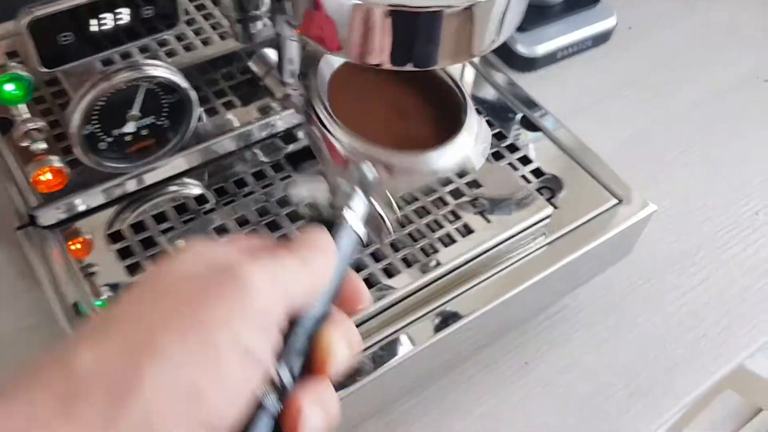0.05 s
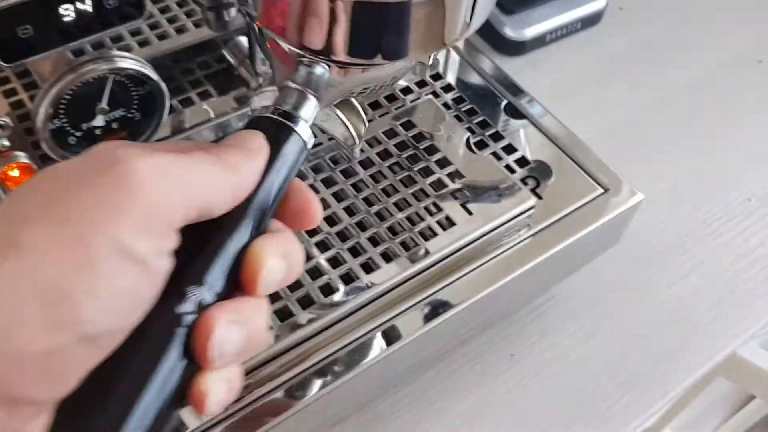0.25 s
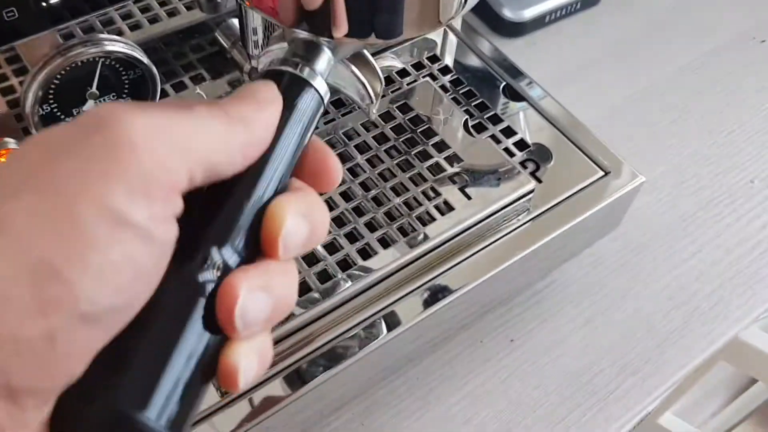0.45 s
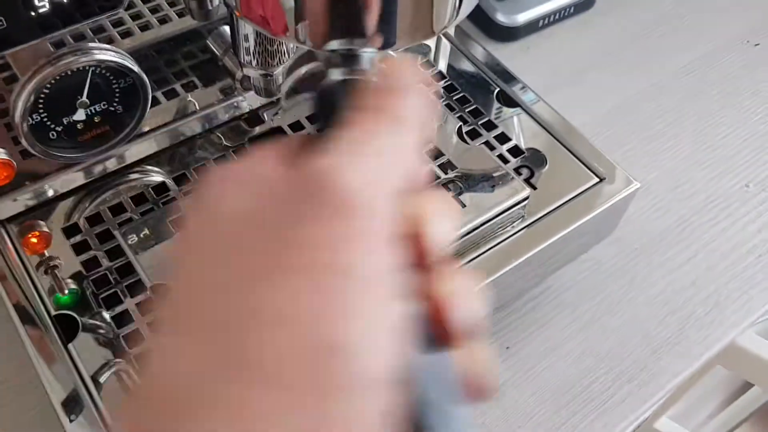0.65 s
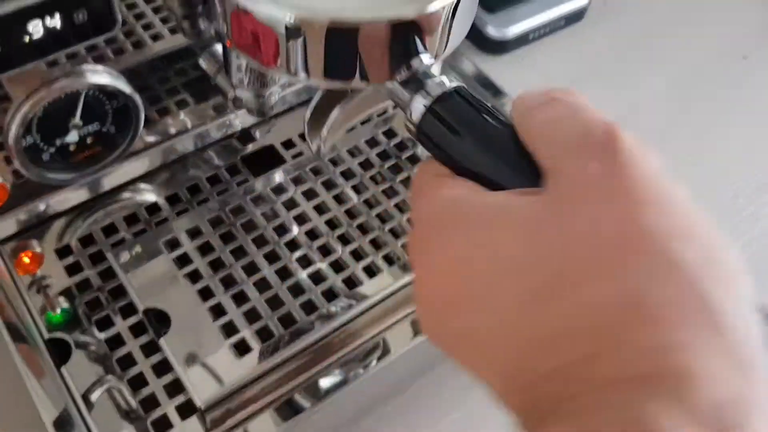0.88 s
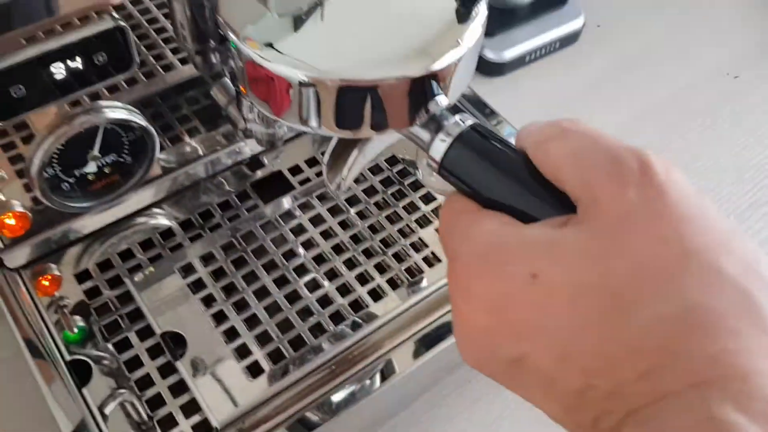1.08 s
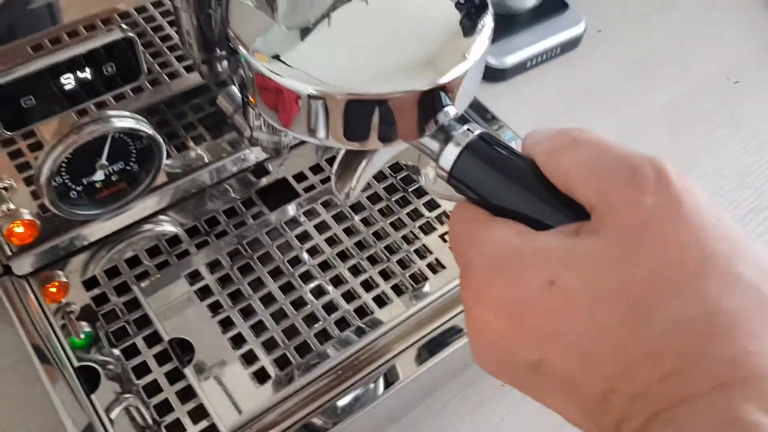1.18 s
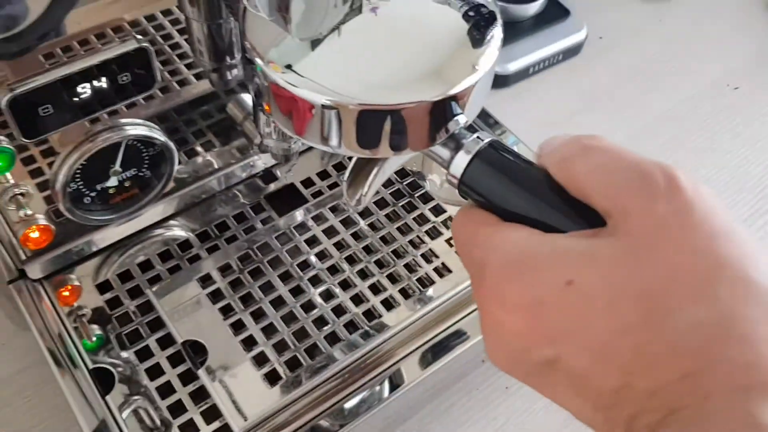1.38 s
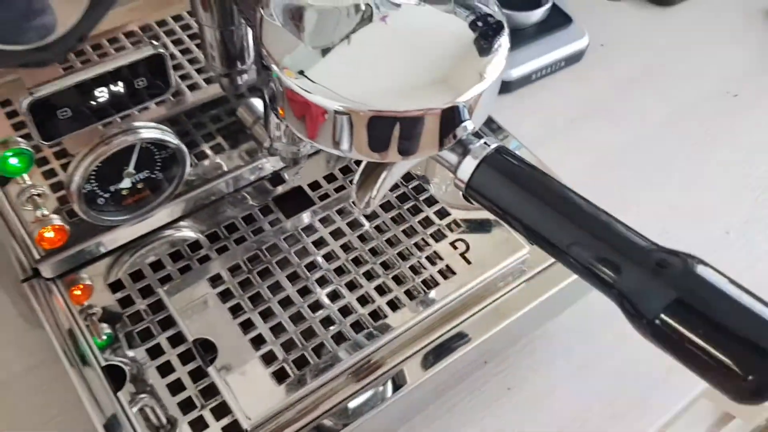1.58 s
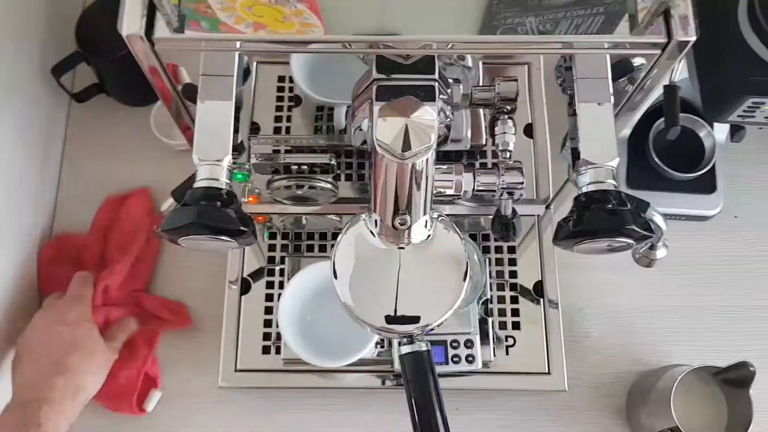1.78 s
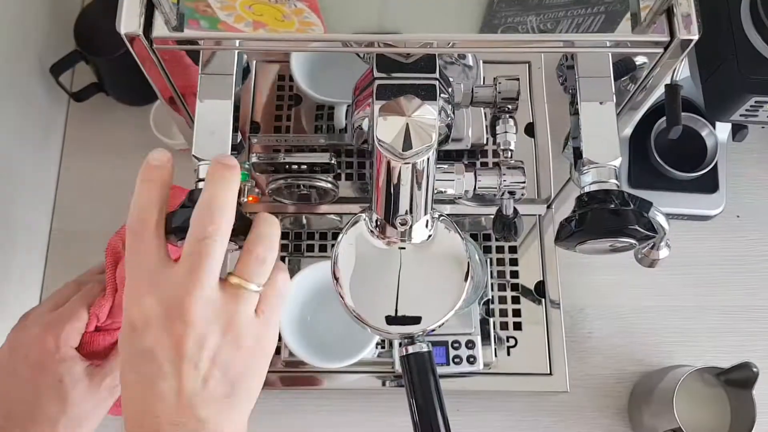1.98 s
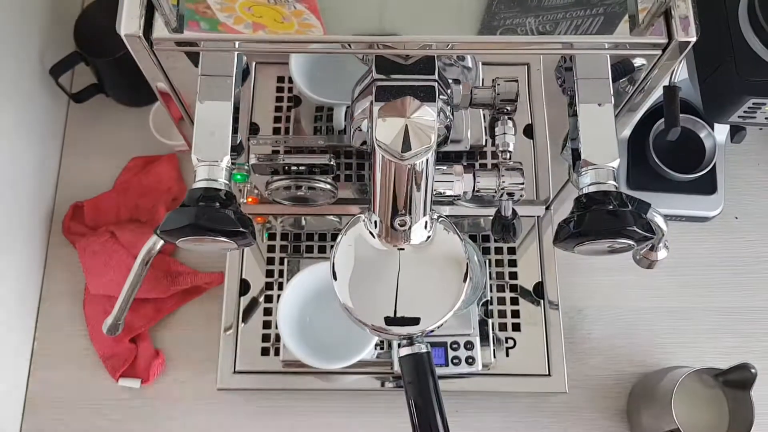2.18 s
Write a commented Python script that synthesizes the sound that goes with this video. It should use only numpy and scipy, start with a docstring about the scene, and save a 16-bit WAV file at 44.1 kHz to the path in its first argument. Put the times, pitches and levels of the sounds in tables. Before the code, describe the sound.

A steel portafilter clunks into an espresso machine, then steam gives one short hiss.

```python
"""Over the hum of an espresso machine in a small kitchen, a steel portafilter knocks into the group head,
seats with a double clunk and is twisted tight. Each contact rings the portafilter, thumps the machine's
body and stirs its sheet panels. Soft knocks follow as the handle is let go, then a cloth rustles.
Near 1.9 s the steam wand spits one short, hissing jet, and at the very end something is bumped."""
import sys
import numpy as np
from scipy import signal
from scipy.fft import rfft, irfft, next_fast_len
from scipy.io import wavfile
from scipy.ndimage import map_coordinates

SR = 44100
rng = np.random.default_rng(int(sys.argv[2]) if len(sys.argv) > 2 else 0)


def store_wav(level_fs):
    """Save 16-bit WAV to argv[1]."""
    pcm = np.round(np.clip(np.atleast_2d(level_fs), -1, 1) * 32767)
    wavfile.write(sys.argv[1], SR, pcm.T.astype(np.int16))


N = 99225

# steel-on-steel hits with a fader for each layer (time [s], portafilter ring [dB], group head [dB],
# panels [dB], clack [dB], tick [dB], thump [dB], leftward pan [dB], favoured pitch [Hz])
METAL_HITS = [(0.22, -38.5, -57, -57.5, -44.5, -26, -46, 4, 1590),
              (0.2232, -12, -47.5, -38.5, -27.5, -17, -18.5, 0, 1597),
              (0.2478, -30.5, -57, -49, -34, -23, -32.5, 7, 1600),
              (0.2767, -16.5, -25, -43.5, -23, -34.5, -31, 2, 660),
              (0.2976, -41.5, -47, -49, -36, -32.5, -38.5, 2, 2200),
              (0.3259, -30.5, -37.5, -50.5, -30.5, -57, -36, 1.5, 797),
              (0.334, -39.5, -45.5, -50, -40.5, -43, -38.5, 1.5, 545),
              (.361, -34.5, -43.5, -48, -38, -49.5, -25, -1.5, 480),
              (0.4131, -26, -48, -51.5, -27, -25.5, -27.5, 6.5, 600),
              (0.4351, -7.5, -24, -28.5, -12, -25, -23, 0, 1473),
              (0.4573, -14, -36.5, -30.5, -16.5, -16, -16, 1, 1230),
              (.489, -45, -43, -42.5, -26.5, -27, -28.5, 5.5, 1620),
              (.509, -52, -42.5, -64, -32, -45, -36.5, 0, 1330),
              (0.6789, -38, -38.5, -55, -37.5, -55.5, -36.5, 4.5, 833)]
# dull knocks through the machine's body (time [s], thump [dB], knock [dB])
DULL_KNOCKS = [(.468, -12.5, -33.5), (0.729, -42.5, -62), (0.838, -51, -81), (.915, -46, -64),
               (0.975, -52, -56), (1.004, -73, -55), (1.455, -47, -71), (1.476, -51.5, -82),
               (2.2255, -41.5, -43), (2.231, -30, -30)]
# cloth and hand strokes (centre time [s], half length [s], level [dB])
CLOTH_STROKES = [(1.654, 0.012, -60), (1.677, .012, -66), (1.761, 0.022, -67), (1.84, 0.017, -65),
                 (2.076, 0.028, -60), (2.119, 0.012, -59), (2.173, .014, -58), (2.235, .02, -61.5)]

# ringing parts (frequency [Hz], level [dB], t60 [s])
PORTAFILTER_MODES = [(3181, -14, 0.045), (3430, -19.5, .05), (4110, -8.5, 0.14), (4143.5, -4, 0.07),
                     (4240, -10, .06), (4387, -19, 0.074), (4400, -20.5, 0.069), (4480, -24, .13),
                     (7246, -23, 0.067), (11950, -21.5, .08), (12515, -18, .11), (13400, -17, .05)]
HEAD_AND_TRAY_MODES = [(505, -30, .9), (660, -6, .12), (858, -18, .85), (1054, -10, .11), (1245, -27, .8),
                       (1394, -25, .7), (1943, -10, .2), (2008, 0, .11), (2130, -6, .1), (2290, -3, .09),
                       (2606, -9, .16), (2845, -5, .16)]
PANEL_MODES = [(1260, -10, .36), (1321, -3, .26), (1458, -1, .26), (1560, -6, .1), (1677, -7, .3),
               (1764, -7, .23), (3040, -9, .23), (3132, -7, .23), (3676, -10, .25)]
BODY_MODES = [(70.8, -17.5, 0.61), (89.43, -20, 0.1), (122, -9.5, .3), (140.5, -8.5, .35),
              (163.5, 1.5, 0.13), (200.7, -4.5, 0.23), (221.25, -3, 0.23), (272, -16.5, 0.23),
              (299.3, -14.5, .28)]
# resonances of the wand and the space round it (frequency [Hz], width [Hz], boost [dB])
WAND_PEAKS = [(751, 50, 3), (1647, 46, 7.5), (1900, 40, 4.5), (2630, 67, 7.5), (4340, 72, -5),
              (5250, 47, 3.5), (7950, 410, 6.5), (8360, 720, 1), (10050, 68, 8.5)]
# the motor's tones (frequency [Hz], level [dB])
HUM_TONES = [(98.5, -67.5), (147.7, -60), (197, -67.5), (245, -81), (334, -88), (503, -92.5)]

# tone colour of each noise layer (frequency [Hz], relative level [dB])
CLACK_EQ = [(100, -19.5), (300, -2), (450, -6), (600, -3), (760, -8), (1050, -1.5), (1350, -4),
            (2000, -1.5), (2600, -8), (3300, -3), (3800, -11), (4400, -9), (5000, -14), (6200, -14),
            (8000, -16), (16000, -36)]
TICK_EQ = [(300, 0), (1500, -3), (4000, -8.5), (5000, -2.5), (7500, -3.5), (9000, -3), (11000, 2.5),
           (12700, 10), (14200, -7.5), (16000, 6.5), (17500, -27)]
CHASSIS_EQ = [(150, -14), (400, -7), (900, -5.5), (1400, -3), (2100, -1), (3000, -5), (3700, -3),
              (4300, 0.5), (5000, -12.5), (6000, -9.5), (9000, -11.5), (12500, -13), (16000, -21.5)]
KNOCK_EQ = [(40, -15), (150, -3), (380, 5), (600, -7.5), (1100, -16), (2500, -19), (5000, -40),
            (16000, -51.5)]
STEAM_EQ = [(50, -15), (160, -3), (300, -4), (500, -6), (700, -6.5), (900, -4.5), (1400, 2), (3000, 1.5),
            (5000, 3), (6300, -1.5), (7700, 1), (12000, 3.5), (15500, -1)]
CLOTH_EQ = [(150, -45), (700, 4), (1500, 1.5), (3500, -2), (7000, -4), (12000, -1.5), (16000, -7)]
ROOM_TONE_EQ = [(25, -16), (55, 6.5), (100, -2.5), (150, 2.5), (210, -8), (270, -11), (370, -17.5),
                (600, -27.5), (1500, -28), (4000, -36), (8000, -35), (12000, -24.5), (16000, -27)]
# stereo image of the noise (frequency [Hz], left-right correlation [-1 to 1])
STEREO_LIKENESS = [(100, 0.88), (300, .94), (650, .85), (1200, -0.29), (3000, 0), (15000, -0.3)]
# length of the kitchen's reverb (frequency [Hz], t60 [s])
REVERB_DECAY = [(100, .6), (300, 0.93), (800, .48), (2000, 0.45), (4500, 0.5), (8000, 0.39), (14000, 0.25)]
# strength of the kitchen's reverb (frequency [Hz], level [dB])
REVERB_EQ = [(100, -14.5), (400, -6.5), (1500, -9.5), (5000, -15), (14000, -12.5)]

RING_ATTACK_S, PANEL_ATTACK_S, BODY_ATTACK_S = .0021, .0018, .0037
GRIP_S, GRIP_T60_S = .03, .052  # free ring, then damping against the group head
CHASSIS_DB, CHASSIS_T60_S, CHASSIS_ATTACK_S = 4.5, .27, .007
SNAP_DB, SNAP_T60_S = 2, .0079  # the first instant of a contact, over its short ring
FAVOUR_DB, FAVOUR_WIDTH = 7, .2  # boost round a hit's favoured pitch; width relative to that pitch
WAVER_RAD, WAVER_PER_S = .4, 60  # loose parts make the ring unsteady
STEAM_S, STEAM_RISE_S, STEAM_HOLD_S, STEAM_FALL_S = 1.895, .036, .058, .042
STEAM_DB, STEAM_DEPTH_DB = -21, 43
SPIT_S, SPIT_LENGTH_S, SPIT_DB = 1.936, .006, 4.5  # the first gush overshoots
HUM_WAVER_DB, HUM_DRIFT_RAD, ROOM_TONE_DB, REVERB_ONSET_S = 1, .25, -63.5, .012
BASS_PAN_DB, STEAM_PAN_DB, CLOTH_PAN_DB = 4.5, 3, 2.99
LOW_CUT_HZ, TOP_HZ, EDGE_HZ, CEILING = 38, 16050, 450, .92


def portafilter():
    """Steel meets the group head: ringing parts, the housing's wash, a clack, a bright tick and a thump."""
    out = np.zeros((2, N))
    for s, ring_db, head_db, panel_db, clack_db, tick_db, thump_db, pan_db, near_hz in METAL_HITS:
        clack = crack(CLACK_EQ, t60=.075, peaks=[(near_hz, near_hz * FAVOUR_WIDTH, FAVOUR_DB)])
        head_modes = favour(HEAD_AND_TRAY_MODES, near_hz)
        panel_modes = favour(PANEL_MODES, near_hz)
        add(out, s, amp(ring_db) * pan(pan_db - 3.5) * clink())
        add(out, s, amp(head_db) * pan(pan_db - 1) * ring(head_modes, PANEL_ATTACK_S, spread=.38))
        add(out, s, amp(panel_db) * pan(pan_db) * ring(panel_modes, PANEL_ATTACK_S, spread=.77))
        add(out, s, amp(panel_db) * pan(pan_db + 1.5) * chassis())
        add(out, s, amp(clack_db) * pan(pan_db) * clack)
        add(out, s, amp(tick_db) * pan(pan_db + 1.5) * crack(TICK_EQ, t60=.073))
        add(out, s, amp(thump_db) * thump())
    return out


def clink():
    """The portafilter rings freely for a moment, then is choked against the group head."""
    held_s = np.maximum(np.arange(SR) / SR - GRIP_S, 0)
    damping = .2 + .8 * amp(-60 * held_s / GRIP_T60_S)
    return ring(PORTAFILTER_MODES, RING_ATTACK_S, spread=.24) * damping


def ring(modes, attack_s, spread):
    """Struck, slightly unsteady modes; spread scatters their phases and widens the stereo image."""
    t = np.arange(SR) / SR
    out = np.zeros((2, SR))
    for hz, db, t60 in modes:
        offset, side, *knots = rng.standard_normal(128)
        age = t[t < 1.5 * t60]
        waver = WAVER_RAD * np.interp(age * WAVER_PER_S, np.arange(len(knots)), knots)
        phase = spread * (offset + np.sign(side) * np.array([[1], [-1]])) + waver
        out[:, :len(age)] += amp(db - 60 * age / t60) * np.sin(2 * np.pi * hz * age + phase)
    return out * (1 - np.exp(-t / attack_s))


def favour(modes, near_hz):
    """The spot that is hit brings out the modes near one pitch."""
    return [(hz, db + FAVOUR_DB * np.exp(-(np.log2(hz / near_hz) / FAVOUR_WIDTH) ** 2), t60)
            for hz, db, t60 in modes]


def crack(spectrum, t60, attack_s=.0005, peaks=()):
    """A noise transient: a snap, then many close resonances that die fast."""
    t = np.arange(SR // 3) / SR
    decay = amp(-60 * t / t60) + amp(SNAP_DB - 60 * t / SNAP_T60_S)
    return noise(spectrum, size=len(t), peaks=peaks) * decay * (1 - np.exp(-t / attack_s))


def chassis():
    """The steel housing's countless weak modes blur into a metallic wash."""
    t = np.arange(SR // 2) / SR
    decay = amp(CHASSIS_DB - 60 * t / CHASSIS_T60_S)
    return noise(CHASSIS_EQ, size=len(t)) * decay * (1 - np.exp(-t / CHASSIS_ATTACK_S))


def thump():
    """The low-end weight: the machine's body rocks on the counter."""
    return pan(BASS_PAN_DB) * ring(BODY_MODES, BODY_ATTACK_S, spread=.15)


def knocks():
    """Soft bumps as the handle is tightened and let go and the hands move on."""
    out = np.zeros((2, N))
    for s, thump_db, knock_db in DULL_KNOCKS:
        add(out, s, amp(thump_db) * thump())
        add(out, s, amp(knock_db) * pan(BASS_PAN_DB) * crack(KNOCK_EQ, t60=.06, attack_s=.003))
    return out


def steam():
    """A turbulent jet from the wand: the valve opens with a spit, the flow holds, the valve shuts."""
    t = np.arange(N) / SR
    age = t - STEAM_S
    opening = np.maximum(1 - age / STEAM_RISE_S, 0) ** 1.3
    closing = np.maximum((age - STEAM_RISE_S - STEAM_HOLD_S) / STEAM_FALL_S, 0) ** 1.8
    flow_db = STEAM_DB - STEAM_DEPTH_DB * (opening + closing)
    spit_db = SPIT_DB * np.exp(-((t - SPIT_S) / SPIT_LENGTH_S) ** 2)
    hiss = noise(STEAM_EQ, peaks=WAND_PEAKS)
    flutter_db = 1.1 * wobble(220)
    return pan(STEAM_PAN_DB) * hiss * amp(flow_db + spit_db + flutter_db)


def cloth():
    """Cloth and hand brush by in soft, grainy swishes."""
    t = np.arange(N) / SR
    strokes = sum(amp(db) * np.exp(-((t - s) / half) ** 2 / 2) for s, half, db in CLOTH_STROKES)
    grain = unit(noise(CLOTH_EQ) * amp(2.7 * wobble(300)))
    return pan(CLOTH_PAN_DB) * strokes * grain


def kitchen(x):
    """The small room's reverb: each frequency dies at its own speed."""
    white = noise([(20, 0), (20000, 0)], size=SR)
    hz, t, bands = signal.stft(white, SR, nperseg=256)
    decay = amp(-60 * t / along(REVERB_DECAY, hz)[:, None]) * (1 - np.exp(-t / REVERB_ONSET_S))
    band_energy = SR * np.mean(decay ** 2, axis=1, keepdims=True)
    decay *= amp(along(REVERB_EQ, hz))[:, None] / np.sqrt(band_energy)
    _, impulse = signal.istft(bands * decay, SR, nperseg=256)
    return signal.fftconvolve(x, impulse, axes=1)[:, :N]


def hum_bed():
    """A slightly wavering motor hum over the kitchen's room tone."""
    t = np.arange(N) / SR
    hum = np.zeros(N)
    for hz, db in HUM_TONES:
        level = np.sqrt(2) * amp(db + HUM_WAVER_DB * wobble(3))
        hum += level * np.cos(2 * np.pi * hz * t + HUM_DRIFT_RAD * wobble(4))
    return pan(BASS_PAN_DB) * (hum + amp(ROOM_TONE_DB) * noise(ROOM_TONE_EQ))


def noise(spectrum, size=N, peaks=()):
    """Stereo noise of rms 1, near mono in the bass; peaks are (frequency [Hz], width [Hz], boost [dB])."""
    hz = np.fft.rfftfreq(size, 1 / SR)
    width_angle = np.arccos(np.clip(along(STEREO_LIKENESS, hz), -1, 1)) / 2
    boost_db = sum(db / (1 + (2 * (hz - centre) / width) ** 2) for centre, width, db in peaks)
    coloured = rfft(rng.standard_normal((2, size))) * amp(along(spectrum, hz) + boost_db)
    mid, side = irfft(coloured * [np.cos(width_angle), np.sin(width_angle)], size)
    return unit(np.array([mid + side, mid - side]))


def amp(db):
    """Decibels to gain."""
    return 10 ** (np.asarray(db) / 20)


def unit(x):
    """Scale to rms 1."""
    return x / np.sqrt(np.mean(x ** 2) + 1e-20)


def along(points, hz):
    """Read a breakpoint curve on a log frequency axis."""
    point_hz, values = np.transpose(points)
    return np.interp(np.log(hz + 1), np.log(point_hz + 1), values)


def pan(db):
    """Stereo gains with the left louder by db."""
    return amp(np.array([[db], [-db]]) / 2)


def wobble(rate):
    """A smooth random modulator, rate knots a second."""
    knots = rng.standard_normal(int(N * rate / SR) + 4)
    return map_coordinates(knots, [np.arange(N) * rate / SR])


def add(track, s, sound):
    """Mix a sound in at s seconds."""
    part = track[:, round(s * SR):][:, :sound.shape[1]]
    part += sound[:, :part.shape[1]]


def scene():
    """The hits fill the room; steam and cloth stay close and dry over the hum."""
    hits = portafilter() + knocks()
    return hits + kitchen(hits) + steam() + cloth() + hum_bed()


def record(dry):
    """The master chain: roll off the deep bass, soft-clip the highest peaks, cut the very top."""
    low_cut = signal.butter(2, LOW_CUT_HZ, "highpass", fs=SR, output="sos")
    thin = signal.sosfilt(low_cut, dry)
    rounded = thin / (1 + np.abs(thin / CEILING) ** 8) ** (1 / 8)
    padded = next_fast_len(N + SR // 2)
    hz = np.fft.rfftfreq(padded, 1 / SR)
    passband = np.sin(np.pi / 2 * np.clip((TOP_HZ - hz) / EDGE_HZ, 0, 1)) ** 2
    return irfft(rfft(rounded, padded) * passband, padded)[:, :N]


dry = scene()
out = record(dry)
store_wav(out)
```